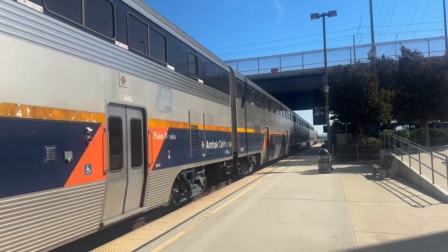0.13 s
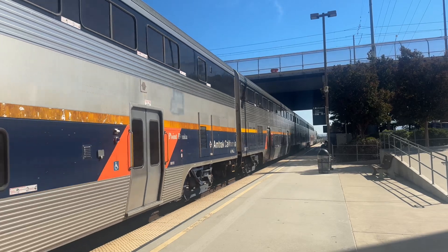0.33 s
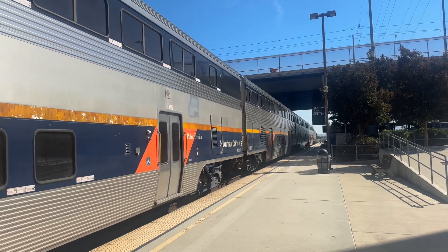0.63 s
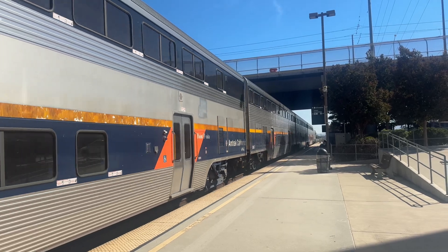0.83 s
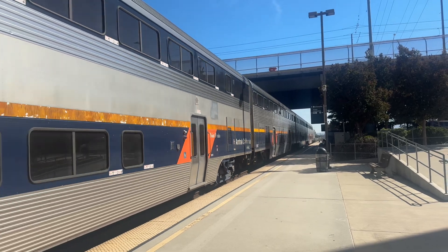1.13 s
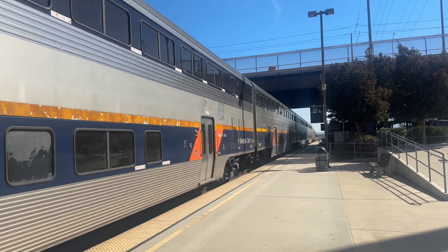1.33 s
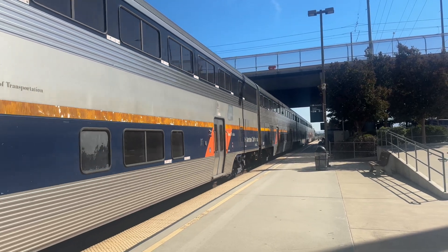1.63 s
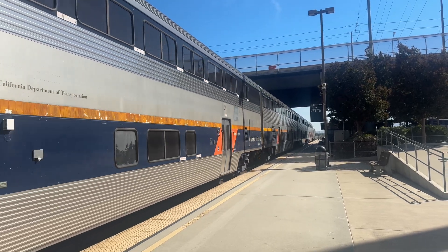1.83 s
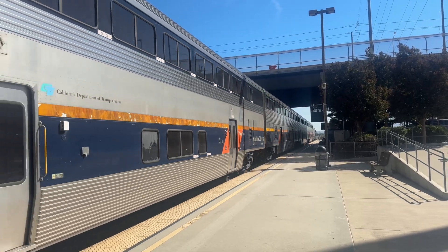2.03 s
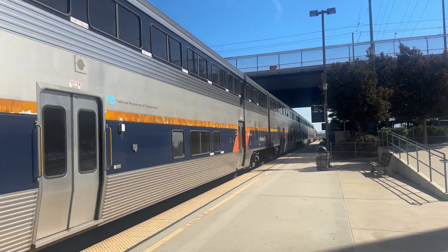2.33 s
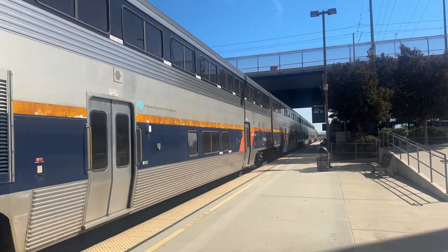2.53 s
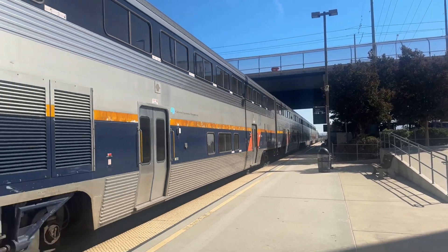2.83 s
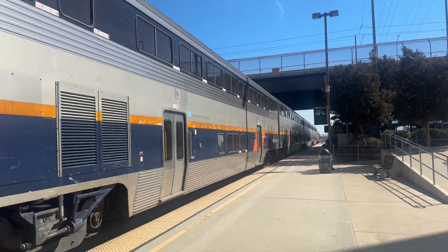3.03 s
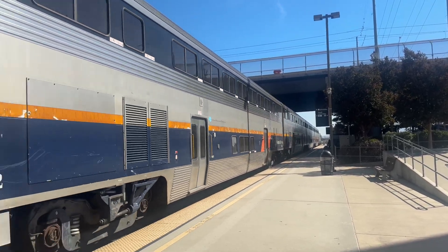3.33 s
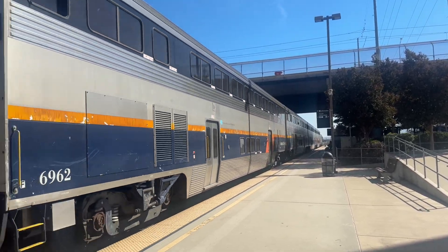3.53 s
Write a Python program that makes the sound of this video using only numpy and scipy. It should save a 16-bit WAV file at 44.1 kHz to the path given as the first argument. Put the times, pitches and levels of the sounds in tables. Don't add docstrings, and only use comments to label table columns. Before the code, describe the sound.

Train wheels rumble heavily on rails beside an outdoor platform. Soft ticks come early, a low engine hum and airy whoosh grow as a car passes close, then it eases with sharper clanks and high venting air.

```python
import sys
import numpy as np
from scipy import signal
from scipy.fft import rfft, irfft, next_fast_len
from scipy.io import wavfile
from scipy.ndimage import uniform_filter1d

SR = 44100
rng = np.random.default_rng(int(sys.argv[2]) if len(sys.argv) > 2 else 0)


def voltage_ratio(decibels):
    exponent = np.asarray(decibels, float) / 20
    return 10 ** exponent


def persist_wave(psi):
    counts = np.round(np.clip(psi, -1, 1) * 32767).astype(np.int16)
    wavfile.write(sys.argv[1], SR, np.atleast_2d(counts).T)


N = 163170
T = np.arange(N) / SR
FFT_SIZE = next_fast_len(N)
HZ = np.fft.rfftfreq(FFT_SIZE, 1 / SR) + 1e-3

# time_s, level_db
ROLLING_LEVEL = [(0, -25.5), (.5, -24.5), (1, -23), (1.6, -19.5), (2, -17.5), (2.6, -20), (3, -21),
                 (3.3, -22.5), (3.7, -23)]
# freq_hz, density_db (per Hz)
ROLLING_COLOUR = [(32, -22), (75, -2), (300, -5), (600, -12.5), (1800, -21.5), (3600, -33.5), (4200, -37.5),
                  (15500, -54)]

# freq_hz, density_db (per Hz)
BOGIE_COLOUR = [(250, -18), (400, -4.5), (800, -4), (1100, -14)]
BOGIE_DB, BOGIE_S, BOGIE_RISE_S, BOGIE_FALL_S = -26, 2.45, 0.16, 0.39

# centre_s, half_length_s, pitch_hz, width_hz, peak_db
RINGS = [(2.54, 0.15, 3416, 140, -41.5), (2.36, 0.29, 3380, 930, -42), (0.86, 0.83, 3330, 510, -48.5),
         (1.4, 0.2, 7200, 1200, -48.5), (1.07, 0.19, 8200, 3000, -53), (1.99, 0.087, 5600, 390, -47.5),
         (0.8, 0.49, 5400, 1100, -54.5), (0.42, 0.48, 97, 17, -25), (3.51, 0.06, 93, 19, -28),
         (2.02, 0.1, 240, 240, -28), (2.67, 0.21, 460, 310, -31.5), (2.09, .2, 520, 150, -30),
         (3.0, 0.03, 220, 9.1, -24.5), (0.37, 0.48, 1460, 540, -42), (1.65, 0.26, 2420, 1900, -37.5),
         (2.2, 0.38, 1900, 1700, -38), (2.8, 0.39, 980, 350, -37), (0.037, .08, 102, 100, -26.5),
         (3.02, 0.49, 4340, 2500, -46), (0.061, 0.09, 2600, 260, -48), (3.3, 0.43, 107, 42, -33)]
RING_FLUTTER_DB = 2.0

# start_s, peak_db, pitch_hz, t60_s
TICKS = [
    (1.27, -41, 4980, .012),
    (1.445, -37, 4900, 0.0094),
    (1.45, -31, 5050, 0.014),
    (3.283, -29.5, 3580, 0.031),
    (3.575, -30, 3300, 0.047),
    (3.58, -42, 5870, 0.062),
]

# time_s, level_db
FAN_LEVEL = [(0, -55), (.5, -46.5), (1, -40), (1.3, -39), (1.65, -37), (2.1, -36.5), (2.4, -34),
             (2.8, -34.5), (3.2, -39.5), (3.7, -48)]
# freq_hz, density_db (per Hz)
FAN_COLOUR = [(700, -2), (2200, -12.5), (3550, -2.5), (3900, -23), (8000, -16.5), (10000, -20.5),
              (12000, -24), (15500, -33)]

# freq_hz, density_db (per Hz)
SLAT_COLOUR = [(8500, -31), (10300, -12), (11700, 4), (13500, -5), (15600, 1)]
SLAT_DB, SLAT_S, SLAT_RISE_S, SLAT_FALL_S = -40, 2.15, 0.35, 0.44

# freq_hz, density_db (per Hz)
VENT_COLOUR = [(9000, -36), (10500, -16), (11800, -3.5), (13300, 1), (14300, 5.5), (15700, -0.5)]
VENT_S, VENT_ATTACK_S, VENT_DB, VENT_SWELL_DB_PER_S = 3.207, 0.004, -35, 7
VENT_RIPPLE_DB = 2.0
# pitch_hz, level_db (relative to each other)
WHISTLES = [(13302, -61), (13399, -57), (13474, -49), (13528, -53), (13684, -57), (13770, -62),
            (13808, -56), (13975, -59), (14018, -58), (14255, -56), (14363, -56), (14567, -62),
            (14998, -57), (15725, -76)]
WHISTLE_WIDTH_HZ, WHISTLE_DB = 20, -10

# time_s, level_db
HUM_LEVEL = [(0, -31.5), (.2, -27.5), (.35, -19.5), (.55, -21), (.71, -28), (.85, -21.5), (1.28, -16),
             (1.6, -17), (1.8, -20), (2.3, -18), (2.6, -18.5), (2.9, -21), (3.2, -25), (3.7, -29.5)]
HUM_HZ, DOPPLER_SHARE, ABEAM_S, PASS_S = 59.25, .011, 1.86, .1
# multiple, centre_s, half_length_s, peak_db
EXHAUST_ORDERS = [(3, 0.28, 0.2, -33.5), (3, .8, 0.21, -32), (3, 1.204, 0.17, -31.5), (3, 2.11, 0.31, -27),
                  (3, 2.72, 0.26, -28), (3, 3.19, .12, -28), (4, 2.2, .04, -26), (4, 1.94, 0.15, -29),
                  (4, 2.6, .18, -27.5), (5, 1.2, .2, -38), (5, 2.15, 0.13, -27.5), (5, 2.48, 0.059, -31),
                  (6, 0.95, 0.097, -34.5), (6, 2.62, .1, -26.5), (7, 2.7, 0.35, -33.5),
                  (8, 1.0, 0.47, -37.5), (9, 2.11, 0.12, -31.5)]
ORDER_WOBBLE_DB, ORDER_WANDER_RAD = 1.5, 0.77

# freq_hz, likeness (0-1)
LIKENESS = [(100, 1), (350, .8), (1100, .5), (2300, .72), (3800, .4), (7000, .25), (8500, .35),
            (9300, .995)]
# freq_hz, left_over_right_db
LEAN = [(70, .3), (520, 1), (760, 5), (1100, 2.5), (1600, 3), (2500, 0), (4000, 0), (5600, 3)]
# freq_hz, lead_turns
TURNS_COMING = [(0, 0), (200, 0), (520, -.18), (1030, -.3), (1900, -.59), (2840, -1.11), (3450, -1.32),
                (7000, -1.8)]
# freq_hz, lead_turns
TURNS_BESIDE = [(0, 0), (170, -.04), (600, -.29), (1030, -.42), (2325, -1.02), (3450, -1.44), (4100, -2.19),
                (7000, -1.85)]
# freq_hz, lead_turns
TURNS_PASSING = [(0, 0), (170, -.02), (690, -.28), (900, -.2), (1300, -.62), (2325, -1.02), (3100, -1.22),
                 (3400, -2.06), (7000, -1.8)]
# freq_hz, lead_turns
TURNS_AHEAD = [(0, 0), (860, -.1), (1290, -.66), (2250, -1), (3100, -1.3), (3500, -2.05), (5000, -2.15),
               (7000, -1.9)]
# freq_hz, side_db
WIDTH_COMING = [(150, 4), (230, 0), (350, 2), (900, 3), (2300, 4), (2850, 0), (4300, 3), (8000, 0)]
# freq_hz, side_db
WIDTH_AHEAD = [(170, 2), (350, -3), (600, 1), (900, -1), (1400, 3), (2300, 3), (3000, 0), (4300, -3),
               (7000, 0), (8300, -3)]
BESIDE_S, PASSING_S, AHEAD_S, SWING_S = 1.35, 2.1, 2.85, .2
ONE_PORT_HZ, TREBLE_LEAD_S = 8100, 1 / 2950
LOW_CUT_HZ, TOP_HZ, HEADROOM = 47, 16100, .8


def rms_one(x):
    return x / np.sqrt(np.mean(x ** 2) + 1e-20)


def table(rows, at, warp=lambda v: v):
    x, y = np.transpose(rows)
    return np.interp(warp(at), warp(x), y)


def in_time(spectrum):
    return irfft(spectrum, FFT_SIZE)[..., :N]


def drift(rate_hz):
    r = np.exp(-80 * np.pi * rate_hz / SR)
    noise = rng.standard_normal(N // 40 + 2002)
    slow = signal.lfilter([1], [1, -2 * r, r * r], noise)[2000:]
    return np.interp(np.arange(N) / 40, np.arange(len(slow)), rms_one(slow))


def swell(s, rise_s, fall_s):
    return np.exp(-.5 * ((T - s) / np.where(T < s, rise_s, fall_s)) ** 2)


def wide_noise():
    mid, side = rfft(rng.standard_normal((2, FFT_SIZE)))
    alike = np.clip(table(LIKENESS, HZ, np.log), 0, 1)
    return np.sqrt(1 + alike) * mid + np.sqrt(1 - alike) * side * [[1], [-1]]


def coloured(spectrum, slow_db, fast_db, ripple_db=0):
    colour = table(spectrum, HZ, np.log) + ripple_db * drift(60)[:len(HZ)]
    whole = wide_noise() * voltage_ratio(colour)
    together = drift(2.6)
    place = 1.5 * np.log2(np.clip(HZ, 40, 16000) / 40)
    out = 0
    for k in range(14):
        if spectrum[0][0] / 2 < 40 * 2 ** (k / 1.5) < spectrum[-1][0] * 2:
            band = in_time(whole * np.clip(1 - abs(place - k), 0, 1))
            flicker_db = slow_db * (together + drift(3.7)) + fast_db * drift(16.0)
            out = out + band * voltage_ratio(flicker_db)
    return rms_one(out)


def wheels():
    return voltage_ratio(table(ROLLING_LEVEL, T)) * coloured(ROLLING_COLOUR, slow_db=0.0, fast_db=0.9)


def bogie():
    gain = voltage_ratio(BOGIE_DB) * swell(BOGIE_S, BOGIE_RISE_S, BOGIE_FALL_S)
    return gain * coloured(BOGIE_COLOUR, slow_db=-1.1, fast_db=1.0)


def rings():
    out, rubbing = 0, [wide_noise(), wide_noise()]
    for k, (s, half_s, hz, width_hz, db) in enumerate(RINGS):
        tone = in_time(rubbing[k % 2] / (1 + (2 * (HZ - hz) / width_hz) ** 2) ** 2)
        loudness = np.sqrt(uniform_filter1d(np.mean(tone ** 2, axis=0), size=5000) + 1e-20)
        gain = voltage_ratio(db + RING_FLUTTER_DB * drift(18.0)) * swell(s, half_s, half_s)
        out = out + gain * tone / loudness
    return out


def ticks():
    out = np.zeros((2, N))
    length = N // 40
    for s, db, hz, t60_s in TICKS:
        knock = rng.standard_normal((2, length)) * voltage_ratio(db - 60 * T[:length] / t60_s)
        band = signal.butter(2, [hz / 1.15, hz * 1.15], "band", fs=SR, output="sos")
        knock = signal.sosfilt(band, knock[0] + .6 * knock)
        start = int(s * SR)
        out[:, start:start + length] += 2 * knock
    return out


def fans():
    return voltage_ratio(table(FAN_LEVEL, T)) * coloured(FAN_COLOUR, slow_db=-0.24, fast_db=1.3)


def slats():
    gain = voltage_ratio(SLAT_DB) * swell(SLAT_S, SLAT_RISE_S, SLAT_FALL_S)
    return gain * coloured(SLAT_COLOUR, slow_db=-1.0, fast_db=1.5)


def vent():
    opened = np.clip((T - VENT_S) / VENT_ATTACK_S, 0, 1)
    seat = sum(voltage_ratio(db) / (1 + (2 * (HZ - hz) / WHISTLE_WIDTH_HZ) ** 2) for hz, db in WHISTLES)
    whistle = voltage_ratio(WHISTLE_DB) * rms_one(in_time(wide_noise() * seat))
    jet = coloured(VENT_COLOUR, slow_db=2.0, fast_db=2.2, ripple_db=VENT_RIPPLE_DB)
    return opened * voltage_ratio(VENT_DB + VENT_SWELL_DB_PER_S * (T - VENT_S)) * (jet + whistle)


def generator():
    pitch_hz = HUM_HZ * (1 - DOPPLER_SHARE * np.tanh((T - ABEAM_S) / PASS_S))
    turn = 2 * np.pi * np.cumsum(pitch_hz) / SR
    hum_gain = voltage_ratio(table(HUM_LEVEL, T) + 0.19 * drift(3.7))
    out = hum_gain * np.sqrt(2) * np.sin(turn + 0.048 * drift(3.9))
    for multiple, s, half_s, db in EXHAUST_ORDERS:
        gain = swell(s, half_s, half_s) * voltage_ratio(db + ORDER_WOBBLE_DB * drift(6.6))
        phase = round(multiple) * turn + ORDER_WANDER_RAD * drift(7.4)
        out += gain * np.sqrt(2) * np.sin(phase)
    return out


def ports(pair, turns, width):
    mid = pair.mean(axis=0)
    pair = mid + (pair - mid) * voltage_ratio(table(width, HZ, np.log))
    treble_turns = [(ONE_PORT_HZ, -2), (SR / 2, (SR / 2 - ONE_PORT_HZ) * TREBLE_LEAD_S - 2)]
    lead = table(list(turns) + treble_turns, HZ)
    lean_share = np.clip((ONE_PORT_HZ - HZ) / 800, 0, 1)
    lean = voltage_ratio(table(LEAN, HZ, np.log) * lean_share / 2)
    return in_time(pair * [lean, np.exp(2j * np.pi * lead) / lean])


def scene():
    return wheels() + bogie() + rings() + ticks() + fans() + slats() + vent() + generator()


def low_pass(x):
    return signal.sosfilt(signal.butter(12, 15870, fs=SR, output="sos"), x)


def record(dry):
    pair = rfft(dry, FFT_SIZE) / (1 + (HZ / TOP_HZ) ** 400)
    moments = np.array([[BESIDE_S], [PASSING_S], [AHEAD_S]])
    beside, passing, ahead = (1 + np.tanh((T - moments) / SWING_S)) / 2
    heard = (1 - beside) * ports(pair, TURNS_COMING, WIDTH_COMING)
    heard += (beside - passing) * ports(pair, TURNS_BESIDE, [(1, 0.0082)])
    heard += (passing - ahead) * ports(pair, TURNS_PASSING, [(1, 0.0096)])
    heard += ahead * ports(pair, TURNS_AHEAD, WIDTH_AHEAD)
    low_cut = signal.butter(2, LOW_CUT_HZ, "high", fs=SR, output="sos")
    heard = signal.sosfilt(low_cut, heard)
    return low_pass(HEADROOM * np.tanh(heard / HEADROOM))


dry = scene()
out = record(dry)
persist_wave(out)
```